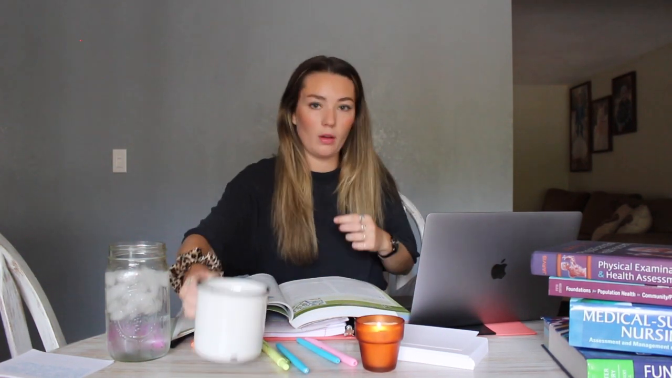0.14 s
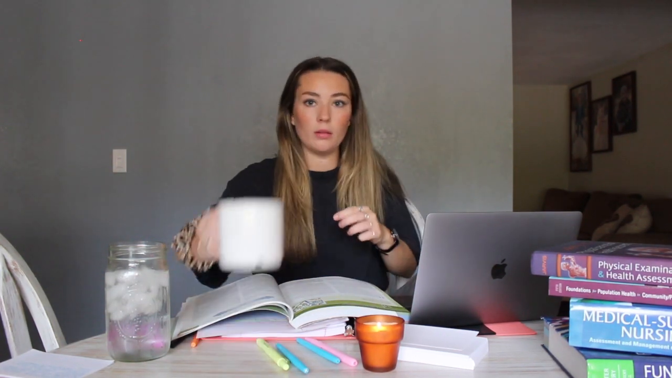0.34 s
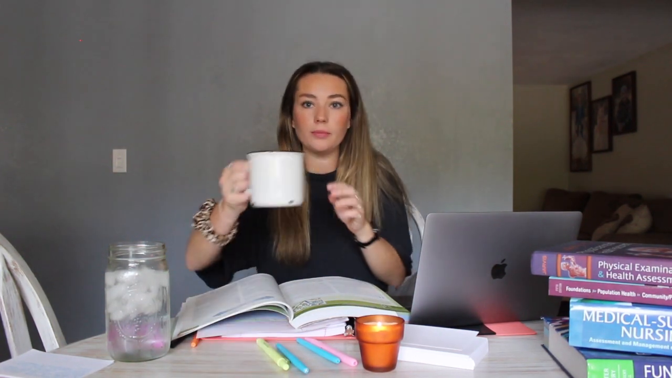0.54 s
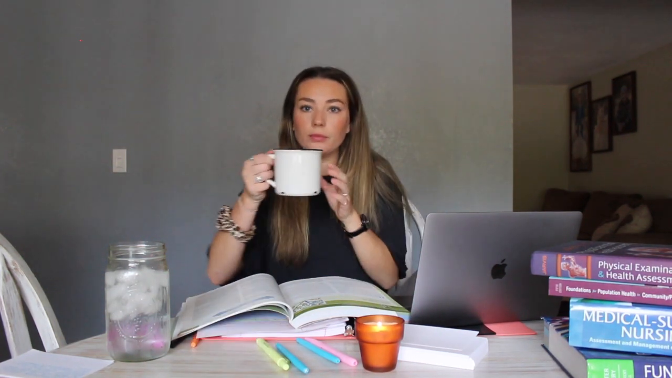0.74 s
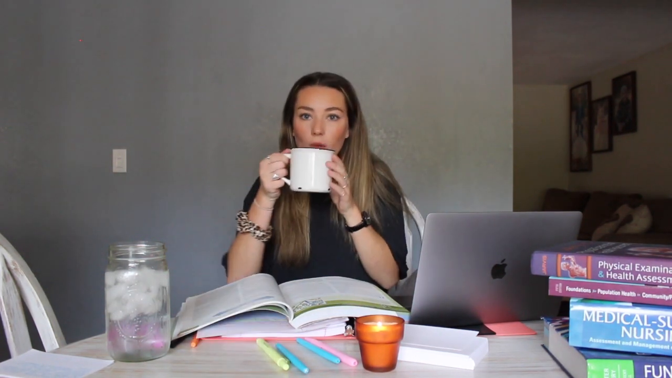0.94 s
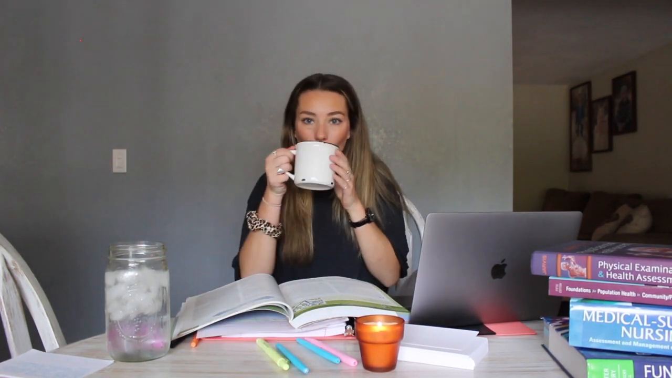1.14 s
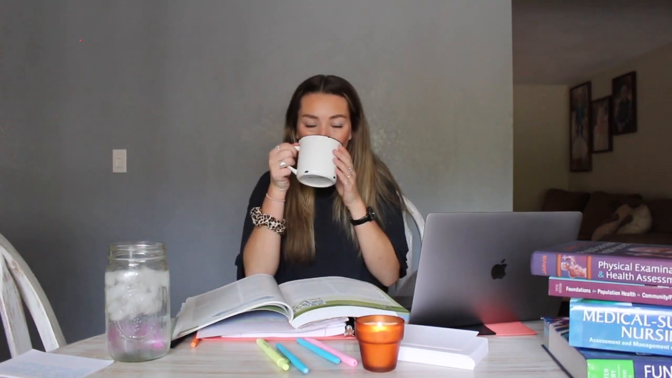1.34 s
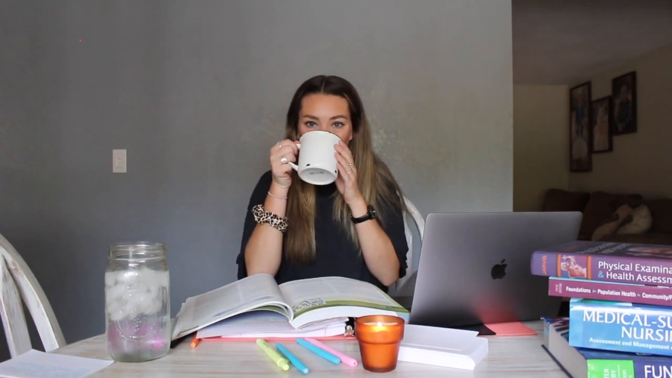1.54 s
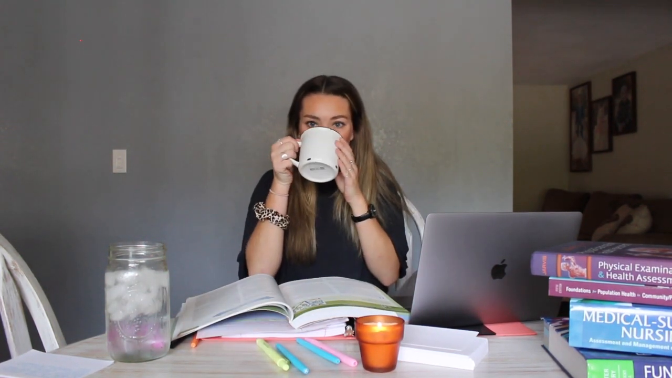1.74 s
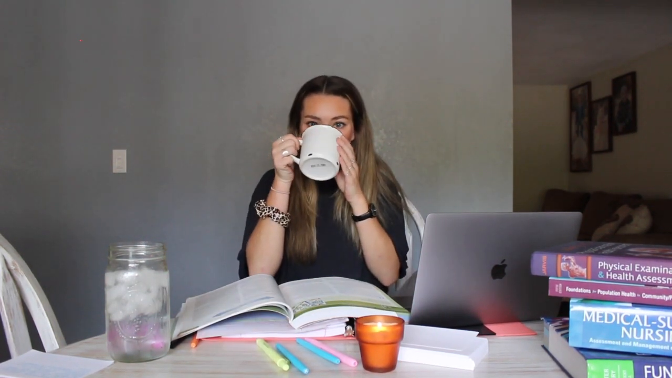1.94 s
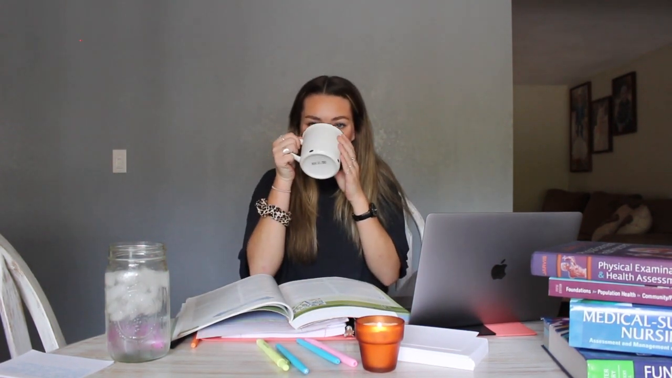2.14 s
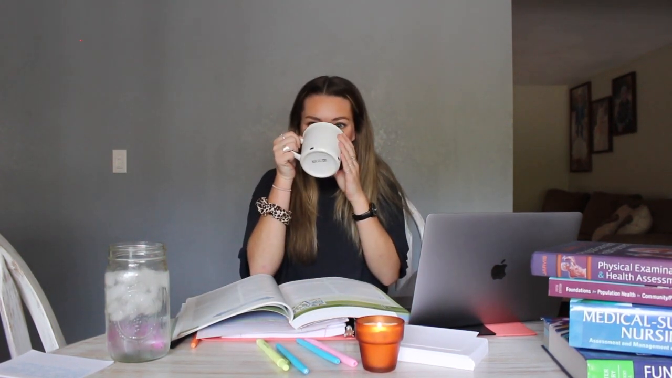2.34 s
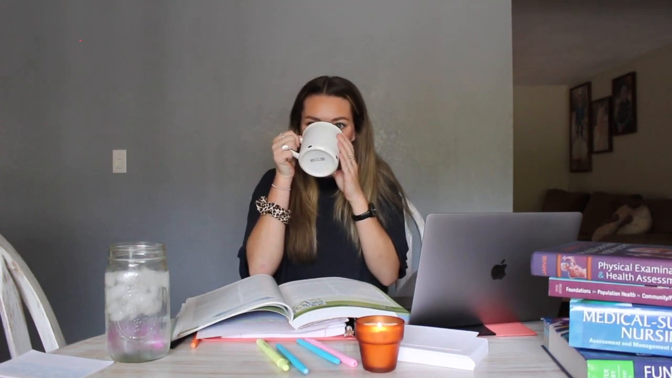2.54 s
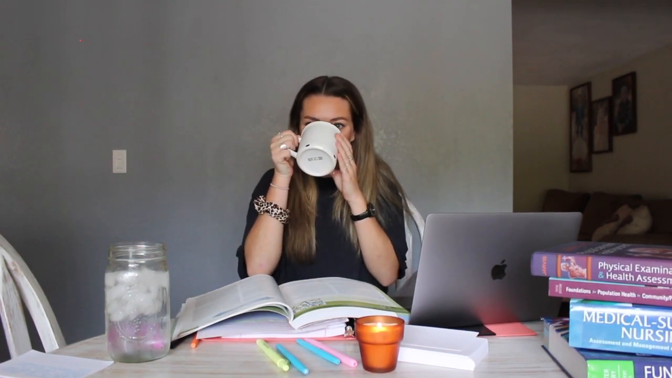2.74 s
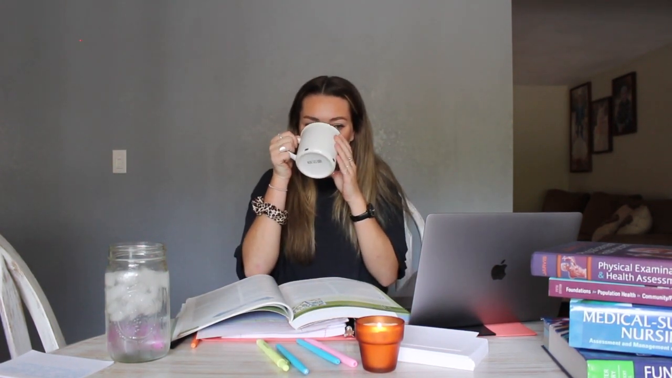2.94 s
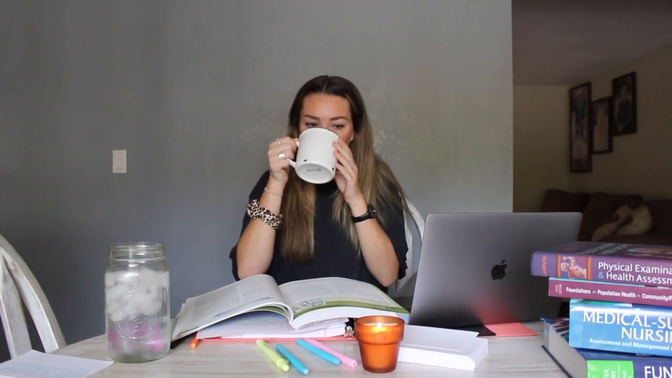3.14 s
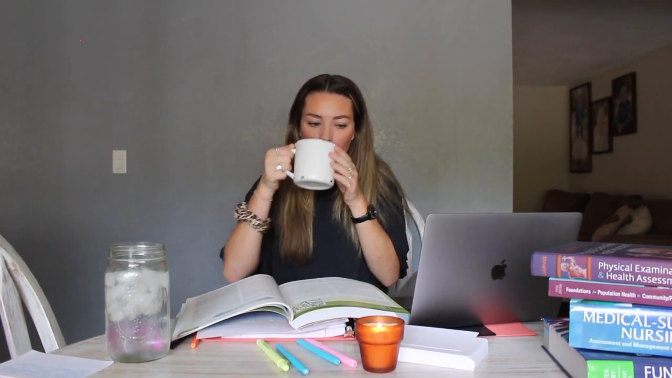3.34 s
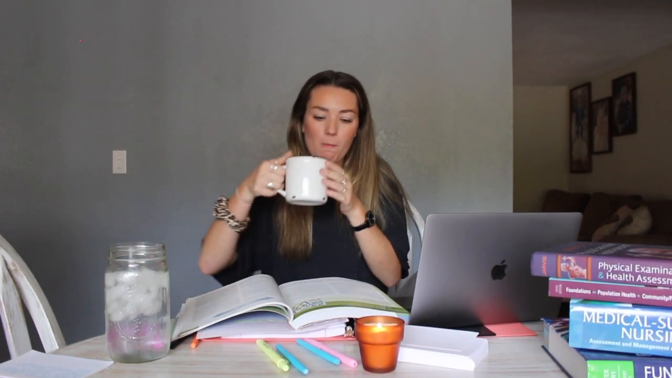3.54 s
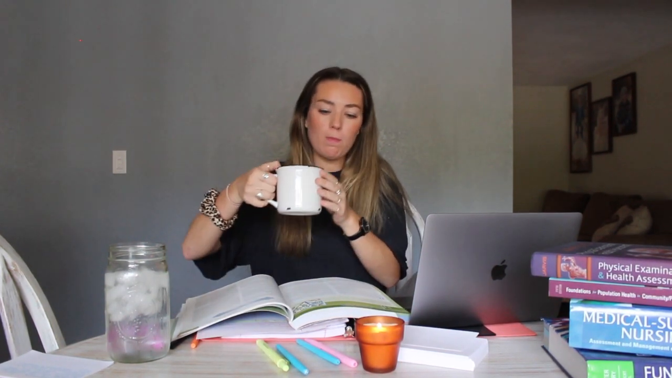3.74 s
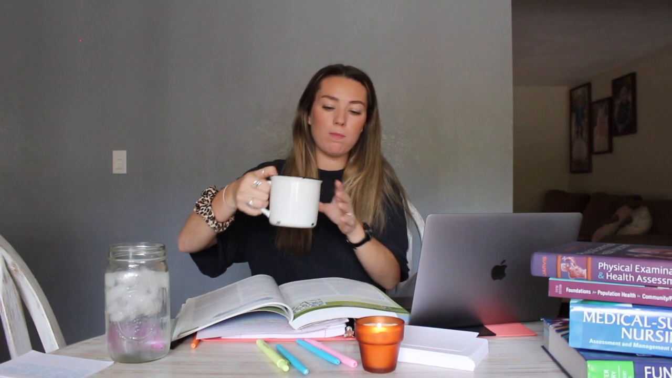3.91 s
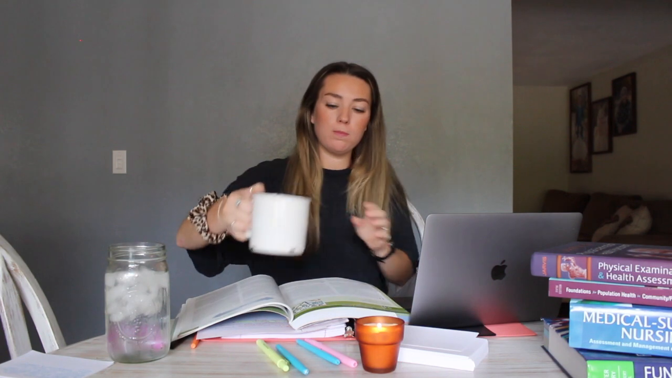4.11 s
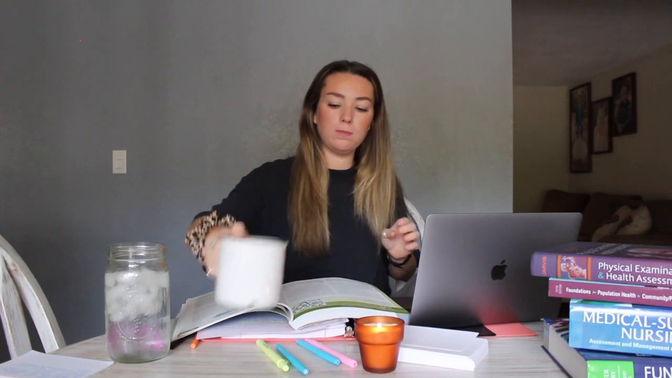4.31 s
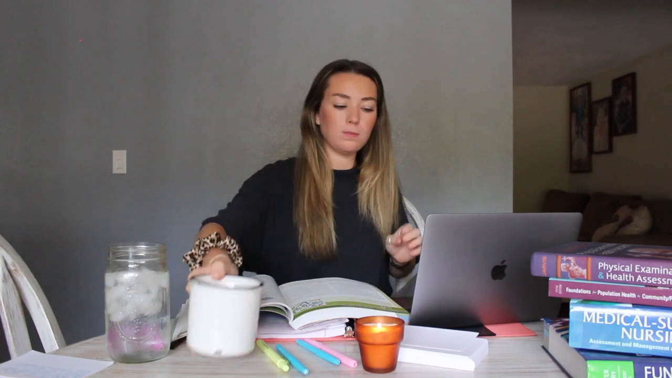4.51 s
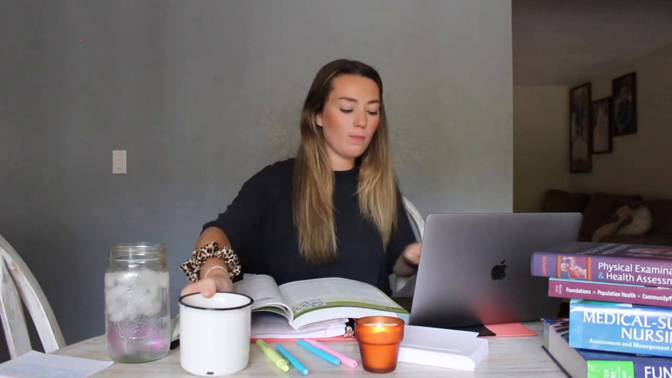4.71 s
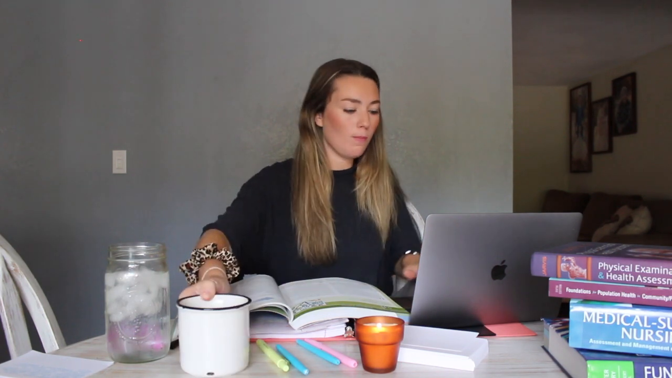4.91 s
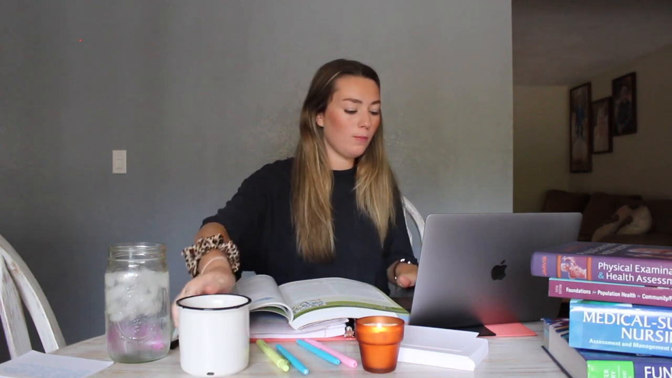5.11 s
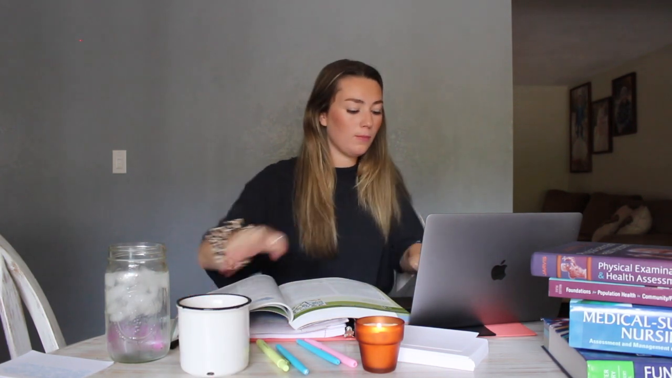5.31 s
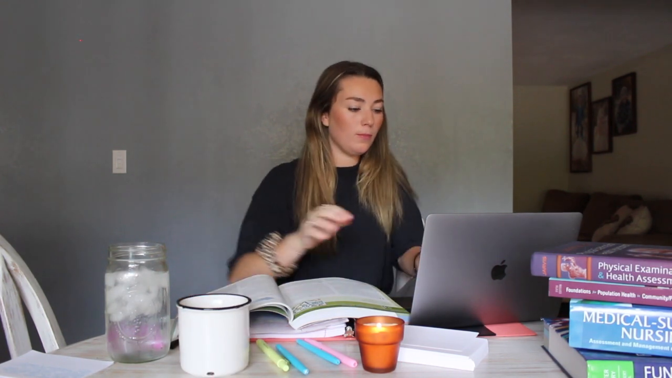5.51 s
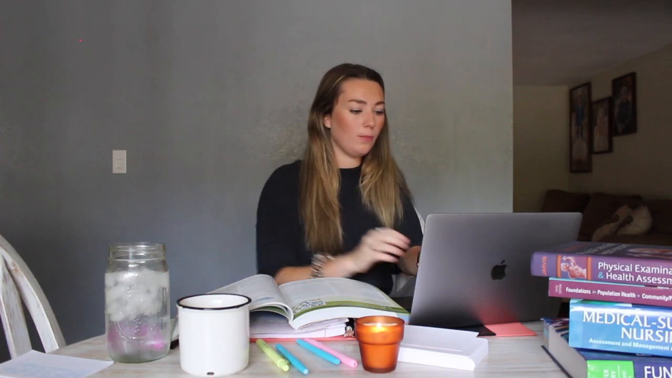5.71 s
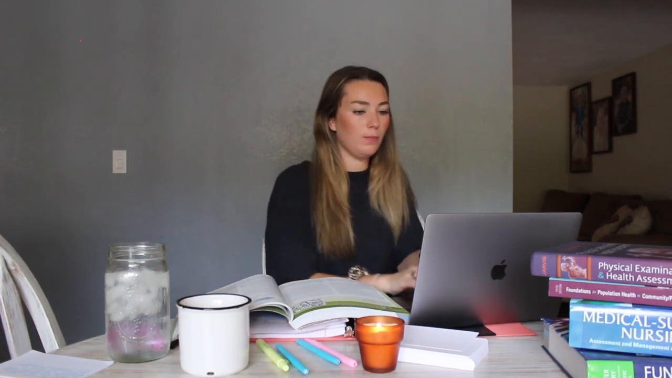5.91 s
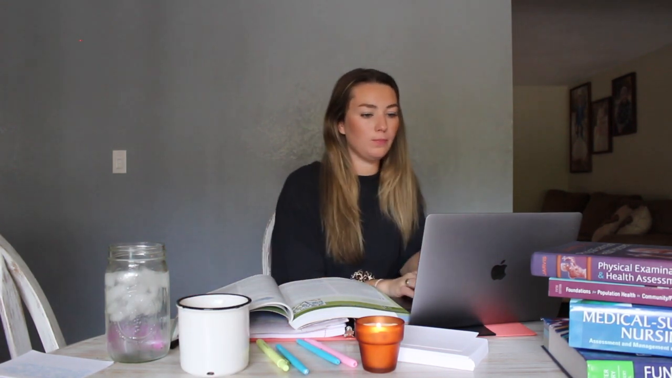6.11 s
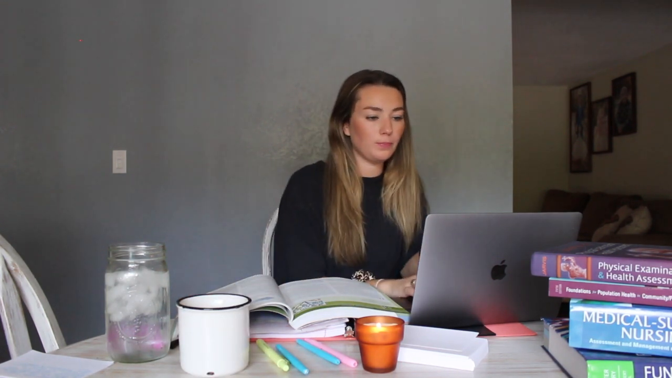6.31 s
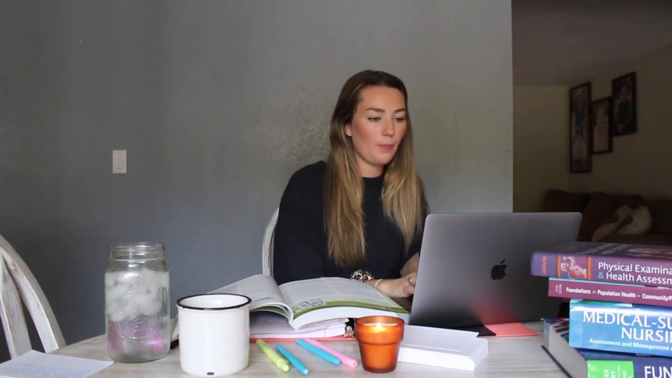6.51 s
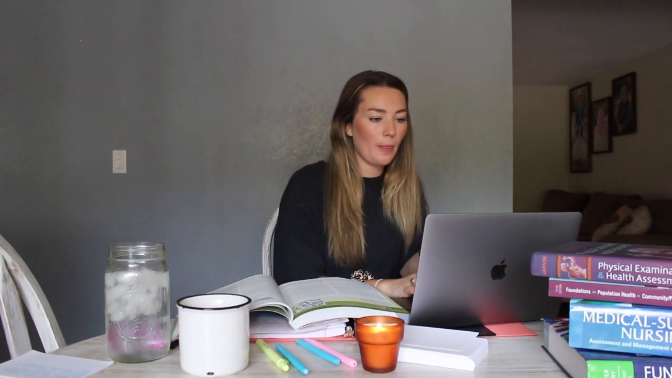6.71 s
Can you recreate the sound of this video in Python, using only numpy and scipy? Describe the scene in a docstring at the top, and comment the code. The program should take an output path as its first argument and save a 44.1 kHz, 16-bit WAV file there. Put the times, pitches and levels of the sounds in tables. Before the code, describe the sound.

Close, dry little lens-motor ticks run over soft room noise, picked up by an on-camera stereo microphone a short distance from a table. A dull mug bump opens, then light finger clicks, cloth rustle and a faint gurgling sip. A sharp, dominant mug knock with a thin enamel chink echoes in the hard room, followed by a hard double clack near a laptop, soft rubbing and busier ticking.

```python
"""A quiet, bare room hums and hisses while a camera's focus motor ticks close to its own microphone.
At first an enamel mug drags and bumps on a wooden table, made by ringing table tones and room echoes.
Small clicks and shaped noise for sleeves and paper come and go; then bubbles and thin fizz make a sip.
The mug lands with a loud knock and a thin chink, and a wrist clacks down beside a laptop.
From then on the motor ticks more often."""
import sys
import numpy as np
from scipy import signal
from scipy.fft import rfft, irfft, next_fast_len
from scipy.io import wavfile
from scipy.ndimage import map_coordinates

SR = 44100
rng = np.random.default_rng(int(sys.argv[2]) if len(sys.argv) > 2 else 0)


def to_wav(sig):
    """Store sig (one row per channel, or 1-D mono) as 16-bit WAV at the path in sys.argv[1].

    Samples outside -1..1 are clipped; the rate is SR.
    """
    pcm = np.clip(np.atleast_2d(sig), -1, 1) * 32767
    pcm = np.round(pcm).astype(np.int16)
    wavfile.write(sys.argv[1], SR, pcm.T)  # frames by channels


N = 302173  # length in samples

# All levels below are relative: the functions may add small trims to them.
# Background hum and hiss. Each row: pitch in Hz, level in dB.
FLOOR_COLOUR = [(12, -48), (20, -5), (116, -5.5), (181, -6.5), (364, -5.5), (418, -5.5), (537, -8),
                (653, -6), (730, -7.5), (993, -6), (1690, -13), (3580, -15), (8270, -21.5), (13300, -28),
                (15700, -32)]
# How alike left and right are in that background. Each row: pitch in Hz, likeness from -1 to 1.
FLOOR_ALIKE = [(60, 0.85), (150, -0.78), (380, -0.45), (950, -0.046), (2380, -0.55), (5980, -0.15),
               (15000, 0.012)]
# Faint drone of household machines. Each row: pitch in Hz, level in dB.
DRONE_COLOUR = [(25, -24), (40, -9), (53, 2.0), (72, -22), (85, -13), (100, -6.5), (125, 1.5),
                (170, -14), (290, -6.5), (365, -5.0), (450, -17), (1000, -55)]
# How fast echoes die in the room. Each row: pitch in Hz, time to fall 60 dB in seconds.
ROOM_DECAY = [(100, 0.87), (350, 0.63), (1000, 0.66), (2700, 0.74), (5500, 0.91), (12000, 0.3)]
# How alike left and right are in echoes and soft noises. Each row: pitch in Hz, likeness from -1 to 1.
ROOM_ALIKE = [(100, 0.79), (640, 0.94), (1400, 0.75), (3100, 0.79), (7000, .1)]
# Arm strokes over book and table. Each row: time of the peak in seconds, length in seconds,
# dull rubbing level in dB, crisp rustle level in dB.
ARM_STROKES = [(0.957, 0.35, -73, -62), (1.162, 0.22, -68, -63), (1.91, .14, -72, -62.5),
               (2.91, 0.31, -65, -61), (3.917, 0.35, -65, -64.5), (4.553, 0.45, -61.5, -76),
               (5.4, 0.51, -76, -63.5), (5.996, 0.33, -56, -63), (6.404, 0.076, -50, -75),
               (6.591, 0.14, -52.5, -67)]
# Tone of the dull rubbing. Each row: pitch in Hz, level in dB.
RUB_COLOUR = [(60, -32), (140, 4), (400, 4.5), (800, -4), (1500, -9), (4000, -47), (10000, -70)]
# Tone of the crisp rustle. Each row: pitch in Hz, level in dB.
RUSTLE_COLOUR = [(600, -31), (2000, 2.5), (4200, -1.5), (7000, -7.5), (15000, -22)]
# The louder focus motor steps. Each row: start in seconds, level in dB.
FOCUS_STEPS = [(0.29, -42), (0.488, -36.5), (0.509, -37), (0.717, -45.5), (0.869, -40), (1.135, -44),
               (1.171, -37), (1.222, -41.5), (1.252, -45), (1.583, -42), (1.726, -40), (1.93, -38.5),
               (3.049, -42.5), (3.247, -38.5), (3.635, -42.5), (3.679, -44), (3.705, -39.5), (4.367, -38.5),
               (5.205, -42.5), (5.377, -41.5), (5.537, -41), (6.252, -35.5), (6.265, -36), (6.466, -42.5),
               (6.517, -45), (6.652, -36), (6.792, -38), (6.811, -38.5), (6.839, -41)]
# Ringing tones of the lens barrel. Each row: pitch in Hz, width in Hz, level in dB.
LENS_TONES = [(420, 100, -6), (1040, 84, 8), (1340, 460, -21), (3060, 550, -16), (4480, 440, -25.5)]
# Small clicks of fingers, ring and drink on the mug. Each row: start in seconds, level in dB,
# pitch in Hz, time to fall 60 dB in seconds.
SMALL_CLICKS = [(0.379, -47, 9060, 0.028), (0.717, -46, 1520, 0.037), (0.717, -44, 450, 0.044),
                (0.834, -56, 1890, 0.38), (0.9727, -43, 4150, 0.057), (0.984, -56, 4120, 0.23),
                (1.1196, -51.5, 2660, .1), (1.8976, -55, 4600, .12), (2.5122, -47.5, 2330, 0.06),
                (2.588, -54, 2360, 0.13), (2.6844, -54, 5200, 0.067), (2.7494, -45.5, 2400, 0.05),
                (3.245, -43, 1380, 0.05), (6.567, -52, 4570, 0.087)]
# Large and small bubbles. Each row: pitch in Hz, pitch spread in octaves, level in dB at full flow,
# dB gained per dB of flow.
GURGLES = [(388, 0.207, -50, 2), (802, 0.122, -56, 0.5)]
# Tone of the drink's fizz. Each row: pitch in Hz, level in dB.
FIZZ_COLOUR = [(1000, -45), (2150, -11), (2350, 3), (2600, -2), (3500, -15), (9000, -50)]
# Wrist and watch beside the laptop. Each row: start in seconds, level in dB,
# contact brightness in Hz, room share in dB.
CLACKS = [(5.6305, -34, 4000, 3), (5.6331, -24.5, 5500, 3.5), (5.6386, -21, 6000, -7),
          (5.703, -42, 9000, 10)]
# Ringing tones of the laptop case. Each row: pitch in Hz, width in Hz, level in dB.
CASE_TONES = [(353, 62, 8), (1050, 490, -0.5), (1550, 380, 3), (2370, 1400, -7.5), (5000, 1150, -7.5)]
# The clack as the room returns it. Each row: pitch in Hz, level in dB.
CASE_ECHO = [(60, -54), (140, -3), (190, -16.5), (350, -4), (430, -11), (590, -24), (820, -9.5),
             (1500, -11), (2500, -15), (3700, -22), (5100, -21), (7500, -29), (14000, -35)]
# The dragging mug as table and room answer it. Each row: pitch in Hz, level in dB.
SCRAPE_COLOUR = [(70, -35), (150, -20), (195, -1), (270, -7), (400, 2), (520, 0), (730, -8), (880, -18),
                 (1300, -26), (1700, -22), (2300, -40), (6000, -59)]
# Tone of the enamel chink. Each row: pitch in Hz, level in dB.
CHINK_COLOUR = [(4000, -25), (8200, -5), (8900, 4), (9700, -5), (12000, -8), (15000, -6)]
# Mug on table. Each row: start in seconds, level in dB, contact brightness in Hz,
# share that rings on in the room in dB.
KNOCKS = [(0.047, -31, 233, -14), (0.0645, -12.5, 170, 5), (0.106, -33, 1500, -5.5),
          (4.7412, 2.5, 2970, -2.5), (4.7462, -18.5, 2000, -18), (4.7872, -11, 1600, 3.5),
          (4.838, -13.5, 1870, 7)]
# Ringing tones of the table top under the mug. Each row: pitch in Hz, width in Hz, level in dB.
TABLE_TONES = [(160.5, 17, -3.5), (405, 57, 1.5), (693, 230, -5.5), (1090, 94, -0.5), (1680, 120, -31),
               (2220, 88, -37), (2824, 43, -20), (3980, 84, -28), (7460, 4000, -51)]
# Standing waves of table and room. Each row: pitch in Hz, level in dB, time to fall 60 dB in seconds.
STANDING_WAVES = [(144, 7, .74), (193, 0, .6), (242, -12, .75), (290, -6, .65), (388, 1, .55),
                  (414, 3, .55), (448, 3, .52), (484, 0, .52), (510, 6, .55), (541, 0, .55), (565, -2, .55),
                  (602, 0, .62), (722, -1, .55), (781, -1, .6), (800, 5, .6), (921, 0, .65), (948, -3, .6),
                  (1012, -3, .6), (1087, -2, .6), (1276, -3, .6), (1331, -6, .6)]
# The knock as the room returns it. Each row: pitch in Hz, level in dB.
WOOD_ECHO = [(40, -72), (105, -17), (170, -16), (270, -11.5), (440, -2.5), (660, -8.5), (820, -2.5),
             (1130, -8.5), (1280, -7.5), (1480, -15), (2050, -21.5), (3100, -30.5), (5000, -38),
             (12000, -52)]

TOP_HZ = 15750  # nothing sounds above this
# part of a stroke spent swelling; how far its peak stands over its two ends
STROKE_RISE_SHARE, STROKE_DEPTH_DB = 0.47, 12
CATCHES_PER_S, RUB_CATCH_DB, RUSTLE_CATCH_DB = 65, 3, 3.5
RUB_REST_DB, RUSTLE_REST_DB = -73, -73  # cloth never lies quite still
FRAME_HZ = 29.97  # camera frames per second, which pace the motor
# faint steps fall at random, more of them once the arm reaches for the laptop
FAINT_STEP_DB, FAINT_SPREAD_DB = -46.5, 1.5
IDLE_STEPS_PER_S, BUSY_STEPS_PER_S, BUSY_FROM_S = 4, 12, 5.75
# the soft nudge of the lens
HUNT_DB, HUNT_HZ, HUNT_SPREAD_HZ, HUNT_RISE_S = -51, 640.5, 13, 0.0029
HUNT_EVERY_FRAMES = 2.25  # on average
# one sip: the flow builds to a peak, then the lips close
SIP_START_S, SIP_PEAK_S, SIP_END_S = 2.47, 2.71, 2.82
SIP_RISE_DB, SIP_FALL_DB = 12, 7
FIZZ_DB, BUBBLE_SPREAD_DB = -66, 1.2
FIZZ_EDGE_S = 0.03  # the fizz starts and stops with the lips and holds steady in between
# the base creeps, breaks loose, then slides ever more lightly until it leaves the wood
SLIP_S, SLIP_ATTACK_S, SLIDE_S, LIFT_OFF_S = 0.059, 0.019, 0.037, 0.023
CREEP_DB, SLIP_DB, SLIDE_FADE_DB_PER_S, LIFT_OFF_DB = -53.5, -30, 246, 33
# thin chink of the enamel just after the landing
CHINK_S, CHINK_DB, CHINK_RISE_S, CHINK_T60_S = 4.749, -44, 0.0039, 0.062


def amp(db):
    """Turn decibels into a multiplier."""
    return 10 ** (np.asarray(db) / 20)


def unit(x):
    """Scale to an average strength (rms) of 1."""
    return x / np.sqrt(np.mean(x ** 2) + 1e-20)


def along(points, hz):
    """Read a value between (Hz, value) points, spacing pitch by ratio as the ear does."""
    f, v = np.transpose(points)
    return np.interp(np.log(hz + 1), np.log(f + 1), v)


def filtered(x, response):
    """Change the strength and timing of each frequency in x by a given response."""
    n = x.shape[-1]
    padded = next_fast_len(n + SR // 4)
    hz = np.fft.rfftfreq(padded, 1 / SR)
    return irfft(rfft(x, padded) * response(hz), padded)[..., :n]


def add(out, s, x):
    """Mix x into out from time s in seconds."""
    i = max(round(s * SR), 0)
    part = out[..., i:i + x.shape[-1]]
    part += x[..., :part.shape[-1]]


def swell(t, peak_s, rise_s, fall_s, rise_db, fall_db):
    """Level in dB under a peak: a steady climb, then a steady fall."""
    return np.minimum(rise_db * (t - peak_s) / rise_s, fall_db * (peak_s - t) / fall_s)


def ring(tones):
    """A struck body rings at its own tones, wide ones dying sooner; half a second, peak 1."""
    f = np.arange(SR // 2 + 1)
    response = 0
    for k, (hz, width, db) in enumerate(tones):
        resonance = 1j * f * width / (hz * hz - f * f + 1j * f * width)
        response = response + (-1) ** k * amp(db) * resonance  # neighbours take opposite signs
    x = irfft(response, SR)
    x[SR // 2:] = 0
    return x / np.abs(x).max()


def noise(colour, alike, size):
    """Coloured stereo noise of rms 1, mixing a shared and an opposed part to set likeness."""
    def response(hz):
        turn = np.arccos(np.clip(along(alike, hz), -1, 1)) / 2
        return amp(along(colour, hz)) * np.array([np.cos(turn), np.sin(turn)])

    mid, side = filtered(rng.standard_normal((2, size)), response)
    return unit(np.array([mid + side, mid - side]))


def echo(colour, build, early_db, early_t60):
    """The room's blurred answer: near surfaces reflect first, then each band dies at its own speed."""
    hz, t, bands = signal.stft(noise(colour, ROOM_ALIKE, size=SR), SR, nperseg=512)
    fade = amp(-60 * t / along(ROOM_DECAY, hz)[:, None])
    tail = signal.istft(bands * fade, SR, nperseg=512)[1][:, :SR]
    age = np.arange(SR) / SR
    early = 1 + amp(early_db - 60 * age / early_t60)
    return tail * (1 - np.exp(-age / build)) * early


def boom():
    """Standing waves that hum on after a blow."""
    t = np.arange(SR) / SR
    waves = 0
    for k, (hz, db, t60) in enumerate(STANDING_WAVES):
        waves = waves + (-1) ** k * amp(db - 60 * t / t60) * np.sin(2 * np.pi * hz * t)
    return waves * (1 - np.exp(-t / 0.005))  # soft start


def blows(rows, body, colour, echo_db, boom_db, build, early_db, early_t60):
    """Each contact rings the body and the room; a softer contact loses its treble."""
    low_hz = 105  # little sounds below this
    out = np.zeros((2, N))
    direct, hum = ring(body), amp(boom_db) * boom()
    for s, db, bright_hz, room_db in rows:
        room = amp(echo_db) * echo(colour, build, early_db, early_t60) + hum
        hit = direct + amp(room_db) * room

        def softness(hz):
            ratio = hz / bright_hz
            return 1 / (1 + 1j * np.sqrt(2) * ratio - ratio ** 2)

        add(out, s, amp(db) * filtered(hit, softness))
    return filtered(out, lambda hz: hz ** 2 / (hz ** 2 - low_hz ** 2 - 1j * hz * low_hz))


def room_tone():
    """Steady rumble and hiss with a faint drone of household machines, all shaped noise."""
    floor = amp(-53.5) * noise(FLOOR_COLOUR, FLOOR_ALIKE, size=N)
    drone = amp(-60.5) * noise(DRONE_COLOUR, ROOM_ALIKE, size=N)
    return floor + drone


def sleeves():
    """Each arm stroke swells and fades; cloth and paper rub in uneven little catches."""
    t = np.arange(N) / SR
    rub, rustle = amp(RUB_REST_DB), amp(RUSTLE_REST_DB)
    for s, length, rub_db, rustle_db in ARM_STROKES:
        rise_s, fall_s = STROKE_RISE_SHARE * length, (1 - STROKE_RISE_SHARE) * length
        stroke_db = swell(t, s, rise_s, fall_s, STROKE_DEPTH_DB, STROKE_DEPTH_DB)
        # hypot adds the strokes as separate noises add: by power
        rub = np.hypot(rub, amp(rub_db + stroke_db))
        rustle = np.hypot(rustle, amp(rustle_db + stroke_db))
    # a smooth curve through random points
    catches = map_coordinates(rng.standard_normal(N // 100), [t * CATCHES_PER_S])
    rubbing = rub * amp(RUB_CATCH_DB * catches) * noise(RUB_COLOUR, ROOM_ALIKE, size=N)
    rustling = rustle * amp(RUSTLE_CATCH_DB * catches) * noise(RUSTLE_COLOUR, ROOM_ALIKE, size=N)
    return rubbing + rustling


def focus_motor():
    """Motor steps ring the lens barrel; the lens also hunts in soft nudges paced by the frames."""
    ticks, step = np.zeros(N), ring(LENS_TONES)
    frames = np.arange(int(N / SR * FRAME_HZ)) / FRAME_HZ
    chance, delay = rng.random((2, len(frames)))
    levels = rng.normal(FAINT_STEP_DB, FAINT_SPREAD_DB, len(frames))
    steps_per_s = np.where(frames < BUSY_FROM_S, IDLE_STEPS_PER_S, BUSY_STEPS_PER_S)
    taken = chance < steps_per_s / FRAME_HZ
    faint = list(zip((frames + delay / FRAME_HZ)[taken], levels[taken]))
    for s, db in list(FOCUS_STEPS) + faint:
        add(ticks, s + 0.00098, amp(db + 2.5) * step)
    t = np.arange(SR // 25) / SR
    shape = t / HUNT_RISE_S * np.exp(1 - t / HUNT_RISE_S)
    for frame in np.floor(np.arange(0.5, len(frames), HUNT_EVERY_FRAMES)):
        nudge = shape * np.sin(2 * np.pi * rng.normal(HUNT_HZ, HUNT_SPREAD_HZ) * t)
        add(ticks, frame / FRAME_HZ - 0.001, amp(HUNT_DB) * nudge)
    # the camera body carries the tick to the left microphone first, the right one 4 samples later
    return np.array([amp(1.5) * ticks, amp(-1.5) * np.roll(ticks, shift=4)])


def small_clicks():
    """Brief pings from handling and sipping: noise squeezed around one pitch, dying away."""
    out, t = np.zeros((2, N)), np.arange(SR // 4) / SR
    touch = 1 - np.exp(-t / 0.001)
    for s, db, hz, t60 in SMALL_CLICKS:
        colour = [(hz / 4, -40), (hz * 0.87, -14), (hz, 0), (hz * 1.1, -14), (hz * 4, -45)]
        ping = noise(colour, ROOM_ALIKE, size=len(t))
        add(out, s, amp(db - 2 - 60 * t / t60) * touch * ping)
    return out


def sip():
    """Bubbles gurgle, a deep gulp joining at full flow; the drink fizzes through the gap at the rim."""
    bubbles, t = np.zeros(N), np.arange(SR // 16) / SR
    envelope = np.exp(-t / 0.014) * (1 - np.exp(-t / 0.001))
    rise_s, fall_s = SIP_PEAK_S - SIP_START_S, SIP_END_S - SIP_PEAK_S
    for at in np.linspace(SIP_START_S, SIP_END_S, 50) + rng.normal(0, 0.004, size=50):
        flow_db = swell(at, SIP_PEAK_S, rise_s, fall_s, SIP_RISE_DB, SIP_FALL_DB)
        for pitch_hz, spread, db, growth in GURGLES:
            hz = pitch_hz * 2 ** rng.normal(0, spread)
            # the pitch rises as the bubble nears the surface
            bubble = np.sin(2 * np.pi * hz * (t + 2 * t * t)) * envelope
            level_db = growth * flow_db + rng.normal(db, BUBBLE_SPREAD_DB)
            add(bubbles, at, amp(level_db) * bubble)
    fizz = noise(FIZZ_COLOUR, ROOM_ALIKE, size=N)
    lip_times = [SIP_START_S, SIP_START_S + FIZZ_EDGE_S, SIP_END_S - FIZZ_EDGE_S, SIP_END_S]
    lips = np.interp(np.arange(N) / SR, lip_times, [0, 1, 1, 0])
    return bubbles + amp(FIZZ_DB) * lips * fizz


def wrist():
    """A hard double clack beside the laptop rings its case and the room."""
    clacks = blows(CLACKS, CASE_TONES, CASE_ECHO, echo_db=-18.5, boom_db=-41.0,
                   build=0.00078, early_db=5.0, early_t60=0.16)
    return clacks * amp([[-0.4], [0.4]])  # a little louder on the right


def drag():
    """The base slides a little on the wood; its fine slips shake the table and the room."""
    free_s, last_db = SLIP_S + SLIDE_S, SLIP_DB - SLIDE_FADE_DB_PER_S * SLIDE_S
    t = np.arange(SR // 4) / SR
    times = [SLIP_S - SLIP_ATTACK_S, SLIP_S, free_s, free_s + LIFT_OFF_S]
    levels = [CREEP_DB, SLIP_DB, last_db, last_db - LIFT_OFF_DB]
    level_db = np.interp(t, times, levels, right=-np.inf)  # silent once lifted
    slips = amp(level_db) * rng.standard_normal(len(t))
    answer = echo(SCRAPE_COLOUR, build=0.0012, early_db=17.5, early_t60=0.096)
    answer = answer / np.linalg.norm(answer[0])
    out = np.zeros((2, N))
    add(out, 0, signal.fftconvolve(slips[None], answer, axes=1))  # every slip gets the answer
    return out * amp([[-0.7], [0.7]])


def chink():
    """The enamel rim sizzles briefly as the mug lands: a short burst of bright noise."""
    out, t = np.zeros((2, N)), np.arange(SR // 4) / SR
    envelope = amp(CHINK_DB - 60 * t / CHINK_T60_S) * (1 - np.exp(-t / CHINK_RISE_S))
    add(out, CHINK_S, envelope * noise(CHINK_COLOUR, ROOM_ALIKE, size=len(t)))
    return out


def mug():
    """The mug bumps the table on lifting; later it lands and rocks flat, ringing wood and room."""
    knocks = blows(KNOCKS, TABLE_TONES, WOOD_ECHO, echo_db=-16, boom_db=-32,
                   build=0.0014, early_db=-22, early_t60=0.05)
    return knocks * amp([[-0.6], [0.6]])


def scene():
    """Everything at the table, from the background to the mug."""
    background = room_tone() * amp([[-0.4], [0.4]]) + sleeves() + focus_motor()
    return background + small_clicks() + sip() + wrist() + drag() + chink() + mug()


def record(dry):
    """Peaks beyond full scale are cut flat; then everything above the top frequency is removed."""
    return filtered(np.clip(dry, -1, 1), lambda hz: hz < TOP_HZ)


dry = scene()
out = record(dry)
to_wav(out)
```